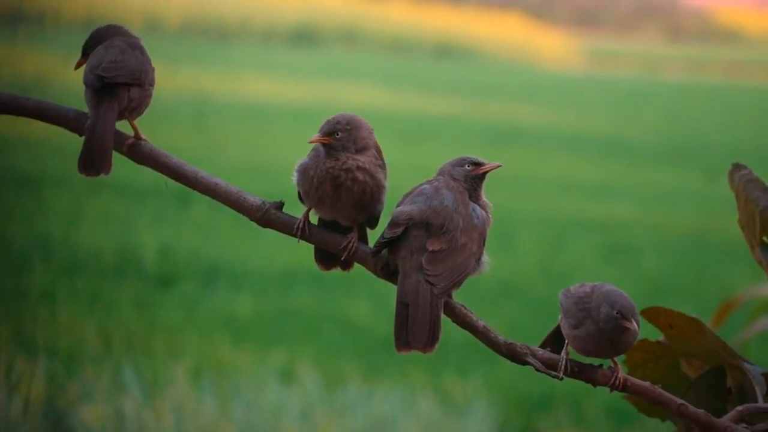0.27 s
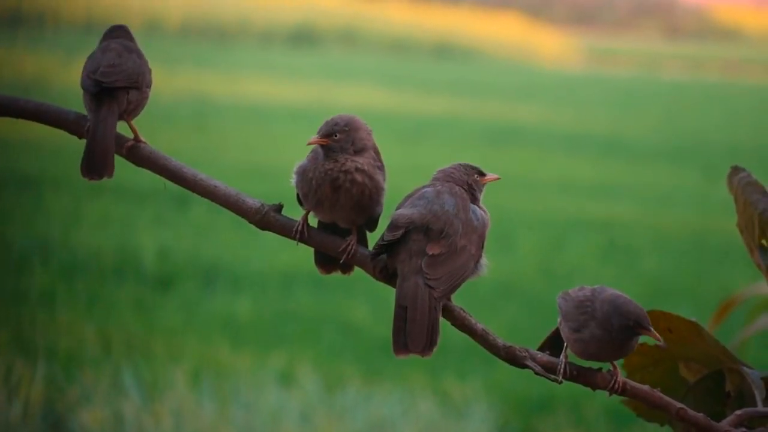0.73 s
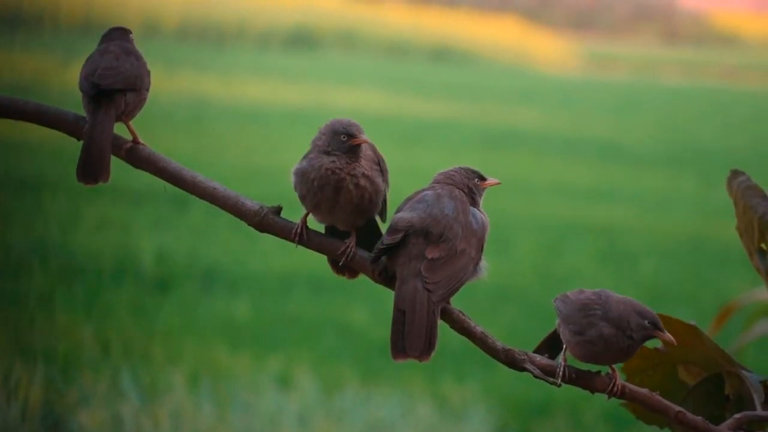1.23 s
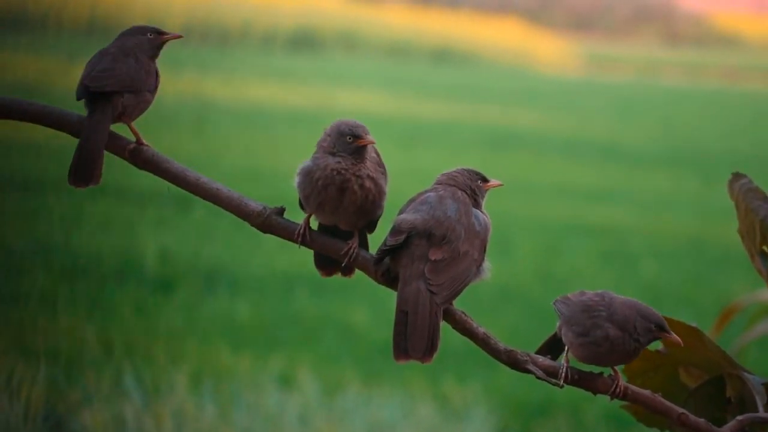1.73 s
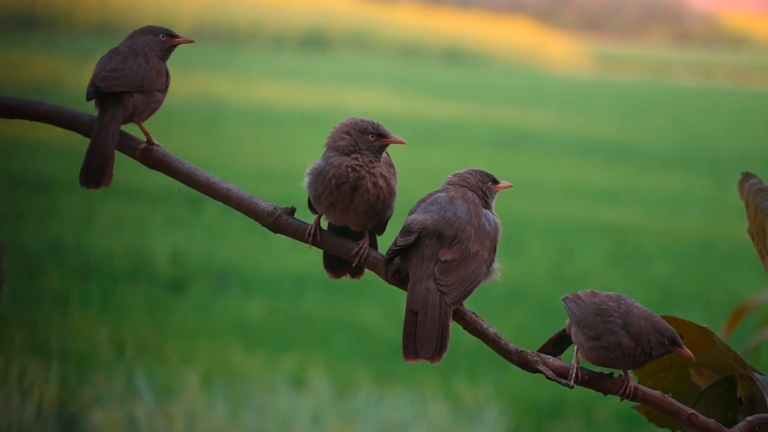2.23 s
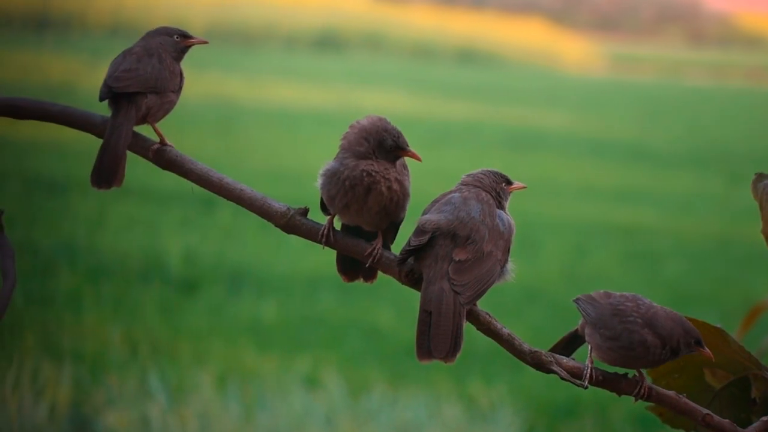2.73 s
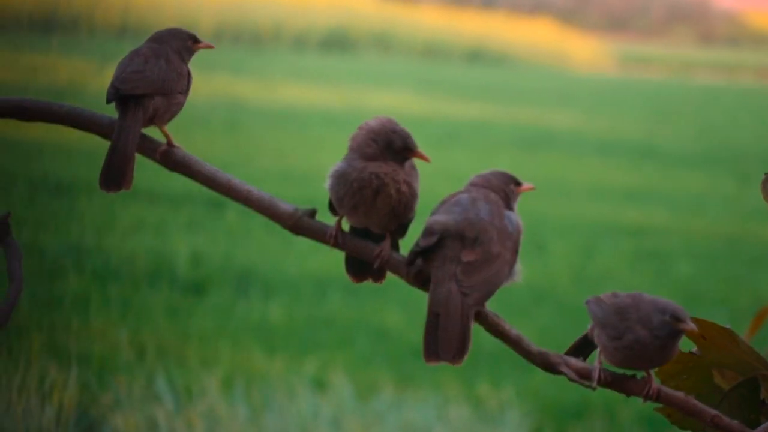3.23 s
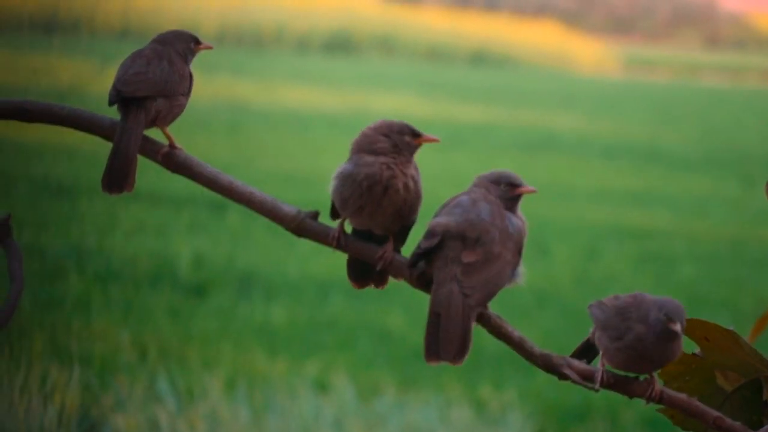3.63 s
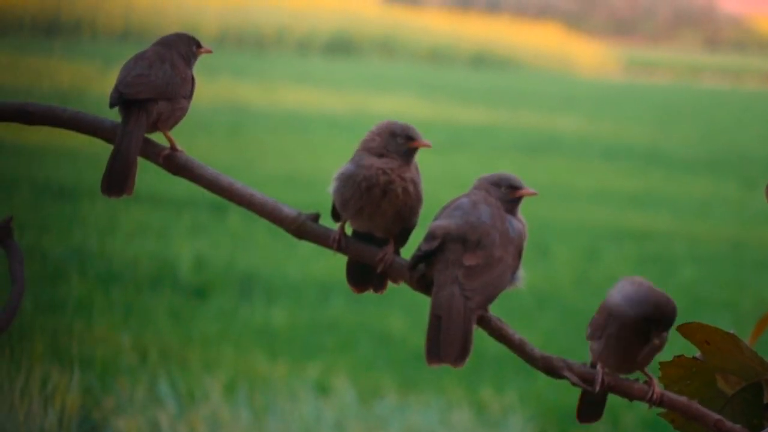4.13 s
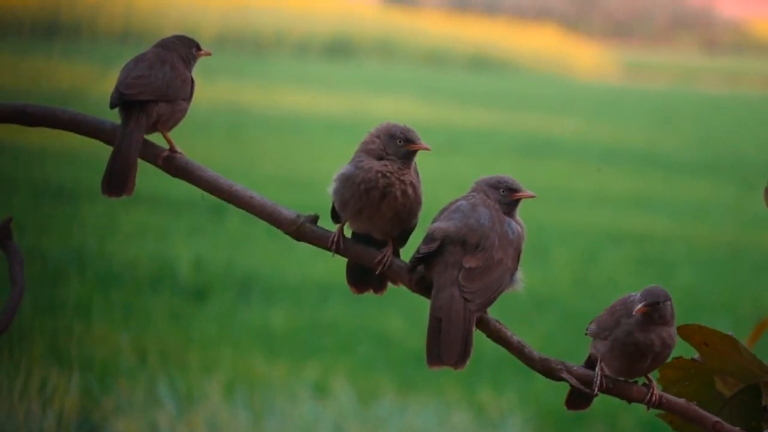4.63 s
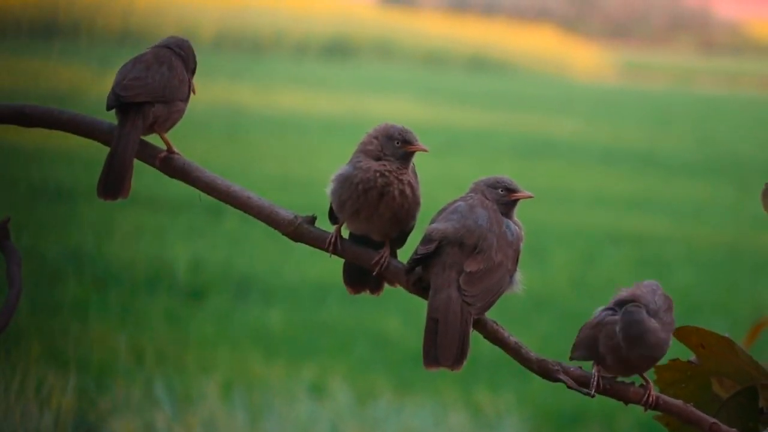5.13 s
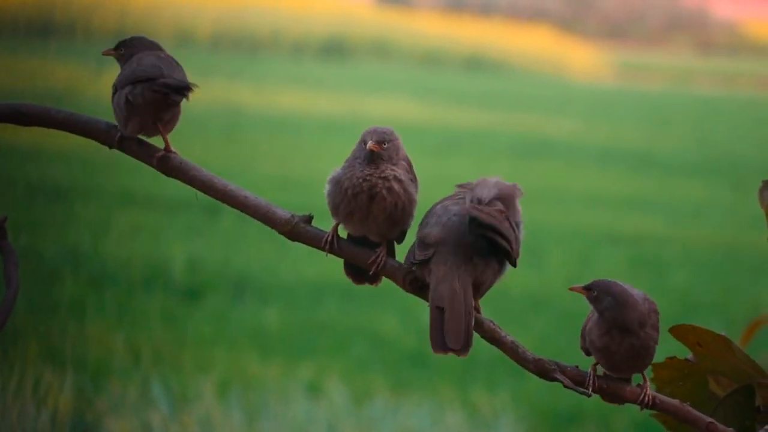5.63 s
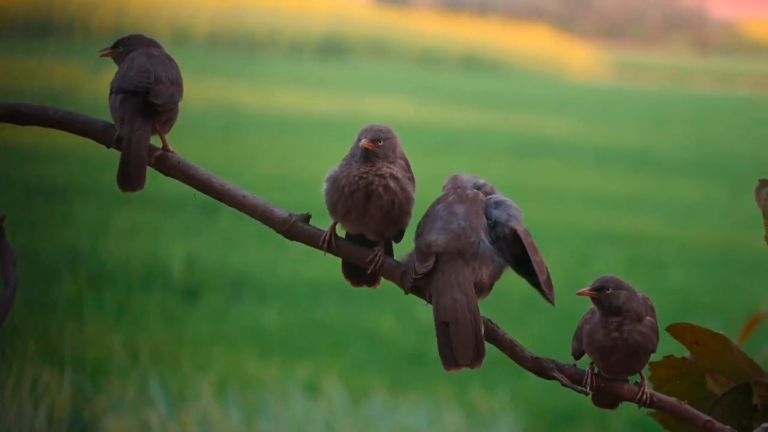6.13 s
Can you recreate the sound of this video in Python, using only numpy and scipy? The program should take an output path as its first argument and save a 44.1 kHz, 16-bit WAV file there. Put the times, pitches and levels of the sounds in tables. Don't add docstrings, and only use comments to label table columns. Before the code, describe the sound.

From 0 to 0.6 seconds a distant bird gives four quick raspy twitters, each flicking up and plunging, with faint insect pips and tiny low hoots. At 0.7 to 1.2 seconds fluttering buzzes and slurs overlap, a dry tick beside them. A lull follows with small twig ticks and faint drops. From about 2.2 to 3.2 seconds a near bird gives five clear rising chirps, roughly a quarter second apart, the first softer, the later ones flatter. After a pause, a small rattle at 3.7 leaps into a bright, strong whistle at 3.9 to 4.05, followed by brief high pips. From 4.5 to 5.7 distant birds answer with dipping, upswung calls, then soft falling two-note calls until 6. Leafy echoes trail throughout, over receding low traffic hum, air in leaves and light microphone hiss, which quieten toward the end.

```python
import sys
import numpy as np
from scipy import signal
from scipy.fft import rfft, irfft
from scipy.io import wavfile
from scipy.ndimage import uniform_filter1d, map_coordinates

SR = 44100
rng = np.random.default_rng(int(sys.argv[2]) if len(sys.argv) > 2 else 0)


def volts_from_db(level):
    exponent = np.asarray(level, float) / 20
    return 10 ** exponent


def digitize_waveform(pressure):
    field = np.atleast_2d(pressure).T
    bounded = np.clip(field, -1, 1)
    quanta = np.round(bounded * 32767).astype(np.int16)
    wavfile.write(sys.argv[1], SR, quanta)


N = 280902


def in_time(rows, t):
    points, *columns = np.transpose(rows)
    return [np.interp(t, points, column) for column in columns]


def drift(rate):
    knots = rng.standard_normal(6000)
    return map_coordinates(knots, [np.arange(N) / SR * rate], order=3)


def coloured(spectrum):
    hz, level_db = np.transpose(spectrum)
    bins = np.maximum(np.fft.rfftfreq(N, 1 / SR), 1)
    colour = volts_from_db(np.interp(np.log(bins), np.log(hz), level_db))
    noise = irfft(rfft(rng.standard_normal(N)) * colour, N)
    return noise / noise.std()


def wide(spectrum, side_db):
    return coloured(spectrum) + volts_from_db(side_db) * coloured(spectrum) * [[1], [-1]]


def add(track, s, sound):
    i = round(s * SR)
    track[i:i + len(sound)] += sound[:N - i]


def whistle(hz, overtone_db):
    phase = 2 * np.pi * np.cumsum(hz) / SR
    return np.sin(phase) + volts_from_db(overtone_db) * np.sin(2 * phase)


def sing(rows, swell, waver, rasp=0., flutter=0., throat=((500, 0), (9000, 0))):
    out, wobble, uneven, torn = np.zeros(N), drift(90), drift(45.9), drift(700)
    for s, length, *bend_hz, level_db in rows:
        u = np.linspace(0, 1, round(length * SR))
        span = (round(s * SR) + np.arange(len(u))) % N
        flutter_hz = 150. * (1 + 0.266 * wobble[span])
        beat = np.cos(2 * np.pi * np.cumsum(flutter_hz) / SR)
        hz = np.polyval(np.polyfit([0, .5, 1], bend_hz, 2), u)
        level = volts_from_db(level_db + in_time(throat, hz)[0] + 2 * flutter * uneven[span])
        level = level * (1 + 0.14 * flutter * beat) * (1 - rasp + rasp * torn[span])
        hz = hz * (1 + waver * wobble[span] + 0.061 * flutter * beat)
        envelope = np.abs(np.sin(np.pi * u)) ** swell
        add(out, s, level * envelope * whistle(hz, overtone_db=-36))
    return out


def bent(rows, start, end):
    return [(s, length, hz * start, hz, hz * end, level_db) for s, length, hz, level_db in rows]


def straight(rows):
    return [(s, length, a, (a + b) / 2, b, level_db) for s, length, a, b, level_db in rows]


def background():
    # f/Hz, level/dB
    traffic_colour = [(12, -48), (20, -12.5), (27, -15), (70, -22), (109, 0.5), (140, -5.5), (166, 5.5),
                      (198, -6.5), (222, -2), (400, -9.5), (520, -26), (880, -120)]
    # f/Hz, level/dB
    air_colour = [(150, -10), (250, -4), (388, -5.5), (486, -2), (1770, -2), (2160, -4), (2370, -3),
                  (6000, -13), (7800, -21), (13200, -120)]
    # f/Hz, level/dB
    hiss_colour = [(2060, -50), (3500, -9.5), (4040, -2.5), (4810, -7.5), (8700, -3), (9440, -4.5),
                   (14200, -12), (15500, -13.5)]
    # t/s, level/dB
    receding = [(0, 4), (.4, 0), (1.5, -0.5), (2.4, -1.5), (5.1, -4), (5.6, -5.5), (6.37, -7.5)]
    receding_db, = in_time(receding, np.arange(N) / SR)
    hum_hz = 170 * (1 + 0.02927 * drift(0.6))
    hum = volts_from_db(-4.0) * whistle(hum_hz, overtone_db=-29) * volts_from_db(drift(7.4))
    traffic_db = -60.5 + receding_db + drift(4.3)
    traffic = volts_from_db(traffic_db) * (wide(traffic_colour, side_db=-28.5) + hum)
    air_db = -48 + 0.47 * receding_db + .5 * drift(9.2)
    air = volts_from_db(air_db) * wide(air_colour, side_db=-31.5)
    hiss = volts_from_db(-58 + 0.62 * drift(12)) * wide(hiss_colour, side_db=-25.5)
    return traffic + air + hiss


def twitter():
    # t/s, plunge length/s, plunge level/dB, uptick level/dB, top level/dB
    syllables = [
        (0.076, 0.034, -34, -43, -39.5),
        (.242, 0.032, -32.5, -33.5, -29.5),
        (.408, 0.052, -31.5, -33, -36),
        (.572, .047, -28.5, -29.5, -32),
    ]
    # f/Hz, level/dB
    throat_colour = [(600, 0), (1900, -9), (2600, -3.5), (3200, -0.5), (3700, 0), (4300, -5), (4800, -3)]
    blip_s, plunge_from_hz, plunge_hz_per_s = .016, 4520, 56000
    upticks = [(s - .03, blip_s, 3274, db) for s, _, _, db, _ in syllables]
    tops = [(s, blip_s, 4765, db) for s, *_, db in syllables]
    plunges = [(s + .013, length, plunge_from_hz, plunge_from_hz - plunge_hz_per_s * length, db)
               for s, length, db, _, _ in syllables]
    rows = bent(upticks, start=.9, end=1.06) + bent(tops, start=.97, end=.975) + straight(plunges)
    return sing(rows, swell=0.13, waver=.013, rasp=0.4, throat=throat_colour)


def insects():
    # t/s, level/dB, f/Hz
    peeps = [(0.0757, -48.5, 8490), (0.2823, -51, 8430), (0.7537, -53, 8450), (4.6638, -46.5, 9850),
             (5.4226, -54, 8920), (5.6506, -53, 8490), (5.854, -51, 8530)]
    rows = [(s - .004, .016, hz, hz, hz, level_db - 2.0) for s, level_db, hz in peeps]
    return sing(rows, swell=1.5, waver=.003)


def hoots():
    # t/s, length/s, f/Hz, level/dB
    calls = [(.187, .022, 2650, -47), (.365, .013, 2070, -46), (.455, 0.038, 660, -48.5),
             (2.335, 0.032, 672, -47), (4.050, 0.046, 746, -54.5), (4.160, 0.04, 1096, -53.5),
             (4.405, 0.03, 1072, -48.5), (2.130, .020, 1120, -53)]
    return volts_from_db(3.5) * sing(bent(calls, start=1.01, end=.98), swell=0.72, waver=0.0046)


def answers():
    # t/s, level/dB, end of dip f/Hz, tag level/dB
    calls = [
        (4.480, -39.5, 3430, -60),
        (4.824, -38.5, 3880, -51),
        (5.178, -40, 4000, -45),
        (5.565, -44.5, 4100, -55),
    ]
    # t/s, length/s, middle f/Hz, level/dB
    hooks = [(.550, .014, 4100, -39), (3.922, 0.014, 4550, -42), (4.160, 0.015, 5890, -45),
             (4.198, 0.013, 4700, -41), (4.222, 0.014, 5800, -43), (4.242, 0.018, 4450, -39.5),
             (4.294, 0.0214, 5870, -44), (4.296, .016, 4865, -36.5), (4.795, 0.034, 5160, -48)]
    # t/s, length/s, middle f/Hz, level/dB
    strays = [(0.19, .022, 3300, -43), (4.162, 0.027, 4530, -38.5), (4.860, 0.063, 3700, -48),
              (5.115, .052, 3730, -50), (5.406, .033, 3360, -46.5), (5.838, 0.033, 3570, -51)]
    drop_s, dip_s, dip_hz = .022, .062, 3325
    drops = [(s, drop_s, 4100, db - 2.5) for s, db, _, _ in calls]
    dips = [(s + drop_s, dip_s, 3600, dip_hz, db) for s, db, _, _ in calls]
    upswings = [(s + drop_s + dip_s, .028, dip_hz, end_hz, db - 2) for s, db, end_hz, _ in calls]
    tags = [(s + .155, 0.0295, 3900, db) for s, *_, db in calls]
    rows = bent(drops + strays, start=1.14, end=.86) + straight(dips + upswings)
    rows += bent(tags, start=.93, end=1.04) + bent(hooks, start=.87, end=1.04)
    return sing(rows, swell=0.14, waver=.007, rasp=.28, flutter=.14)


def ticks():
    # t/s, level/dB, low f/Hz, high f/Hz, time to fall 60 dB/s
    knocks = [(.580, -28, 790, 3000, .02), (1.390, -31, 3780, 6740, .03), (1.528, -37, 3500, 9000, .03),
              (1.612, -31.5, 1500, 6040, .04), (2.302, -24, 2370, 4100, 0.067),
              (2.303, -40.5, 900, 9000, 0.14), (2.4512, -21, 790, 5500, 0.0034),
              (.603, -33, 5500, 7500, .02), (2.278, -53, 2980, 8010, 0.026),
              (4.160, -39, 6170, 11100, 0.023), (3.314, -37, 2980, 7840, .02), (.606, -36, 90, 900, .03),
              (4.625, -28.5, 3000, 5030, .05)]
    out, t = np.zeros(N), np.arange(4000) / SR
    bursts = rng.standard_normal((len(knocks), len(t)))
    for burst, (s, level_db, low_hz, high_hz, t60) in zip(bursts, knocks):
        band = signal.butter(3, [low_hz, high_hz], "band", fs=SR, output="sos")
        attack = np.minimum(t / t60 / 0.029, 1)
        add(out, s, volts_from_db(level_db - 60 * t / t60) * attack * signal.sosfilt(band, burst))
    return out


def buzzes():
    # t/s, length/s, start f/Hz, end f/Hz, level/dB
    slurs = [ (.700, 0.049, 4850, 4720, -38), (.700, 0.058, 3750, 2500, -40),
             (.740, .075, 2150, 2600, -37.5), (.806, 0.059, 3250, 3560, -31), (.850, .095, 3300, 4270, -46),
             (.830, 0.092, 3400, 4550, -40), (.950, .080, 4510, 5060, -36.5),
             (1.005, .125, 3670, 2870, -33), (1.045, .060, 4900, 4930, -43), (1.120, .100, 2920, 3000, -50),
             (.810, 0.0955, 4900, 3800, -43), (.840, 0.075, 2500, 2130, -51),
             (3.940, 0.087, 4600, 4500, -43), (4.045, .029, 5500, 5100, -45.5),
             (4.050, 0.057, 3730, 3540, -43), (2.9, .034, 4860, 4850, -53.5),
             (6.160, .060, 4200, 3300, -56), (5.145, .044, 4680, 4980, -45),
             (4.120, .068, 12000, 13000, -56), ]
    return sing(straight(slurs), swell=.5, waver=.012, rasp=.35, flutter=1.)


def falling_notes():
    # t/s, length/s, start f/Hz, end f/Hz, level/dB
    falls = [ (1.100, .130, 2570, 2610, -40.5), (1.140, 0.068, 2076, 2075, -38.5),
             (1.405, .025, 4170, 3700, -47), (1.770, .025, 4500, 4100, -51), (2.045, .020, 4290, 4040, -48),
             (3.010, 0.047, 4330, 3250, -54), (3.035, .020, 5600, 5080, -53),
             (3.340, 0.069, 4900, 3200, -53), (3.470, .050, 3920, 3030, -50.5),
             (3.480, .015, 4760, 4850, -51), (4.770, 0.051, 2190, 2090, -43.5),
             (4.885, .04, 5700, 5050, -50), (5.515, 0.075, 2870, 2070, -48), ]
    # slide t/s, slide level/dB, pip t/s, pip level/dB
    two_notes = [
        (5.130, -47, 5.190, -46.5),
        (5.230, -51, 5.300, -44),
        (5.795, -49, 5.860, -43),
        (5.915, -48, 5.965, -47),
    ]
    slides = [(s, .06, 2750, db) for s, db, _, _ in two_notes]
    low_pips = [(s, .039, 2170, db) for _, _, s, db in two_notes]
    rows = straight(falls) + bent(slides, start=1.14, end=.86) + bent(low_pips, start=1.055, end=.97)
    return sing(rows, swell=.5, waver=.008, rasp=.25, flutter=.3)


def chirp(s, full, plateau_hz, creep, level_db):
    attack_s, release_s = .036, 0.021
    t = np.arange(0, full + release_s, .002)
    hz = np.minimum(1313 + 16800 * t, plateau_hz + creep * (t - attack_s))
    swell_db = -22 * np.maximum(1 - t / attack_s, 0) ** 1.22
    fade_db = -13 * np.maximum((t - full) / release_s, 0) ** 1.26
    return np.transpose([s + t, hz, level_db + swell_db + fade_db])


def chirps_and_whistle():
    # t/s, full voice until/s after start, plateau f/Hz, creep/Hz per s, level/dB
    chirps = [
        (2.186, 0.04, 2017, 6000, -24.5),
        (2.396, 0.049, 1915, 2220, -17),
        (2.642, 0.05, 1938, 1200, -17.5),
        (2.886, 0.0634, 1903, 60, -17),
        (3.148, 0.068, 1901, 50, -17.5),
    ]
    # t/s, f/Hz, level/dB
    long_whistle = [(3.922, 1900, -29), (3.930, 2344, -18), (3.945, 2260, -16), (3.951, 2270, -20),
                    (3.995, 2238, -14), (4.008, 2260, -14.5), (4.014, 2262, -20), (4.037, 2278, -16.5),
                    (4.047, 2730, -29.5)]
    out = np.zeros(N)
    for note in [chirp(*row) for row in chirps] + [long_whistle]:
        t = np.arange(note[0][0], note[-1][0], 1 / SR)
        hz, level_db = (uniform_filter1d(c, size=180, mode="nearest") for c in in_time(note, t))
        envelope = volts_from_db(level_db) * signal.windows.tukey(len(t), .08)
        add(out, t[0], envelope * whistle(hz, overtone_db=-54.0))
    return out


def grace_notes_and_rattle():
    # t/s, length/s, middle f/Hz, level/dB
    graces = [(2.155, 0.024, 2030, -38), (2.362, 0.032, 2400, -36.5), (2.452, .018, 2080, -22.5),
              (2.612, 0.034, 2540, -33.5), (2.712, 0.018, 1984, -23.5), (2.862, 0.021, 2570, -32.5),
              (3.122, 0.036, 2546, -33.5)]
    flicks = [(3.726, .016, 2900, -40.5), (3.776, .011, 1720, -33.5), (3.775, .0075, 2750, -34),
              (3.785, .008, 3250, -36), (3.857, .008, 1740, -32), (3.855, .011, 3050, -37),
              (3.873, .008, 1750, -33), (3.876, .008, 3450, -39)]
    arches = [
        (3.708, 0.021, 2190, -27),
        (3.732, 0.036, 1755, -32),
    ]
    pipes = [(3.741, 0.028, 3450, -36.5), (3.760, 0.019, 2620, -34), (3.886, .028, 3700, -41),
             (4.043, .024, 3040, -20), (4.052, .019, 2597, -22.5), (4.168, 0.019, 3290, -30),
             (4.226, 0.024, 3315, -34.5), (4.302, 0.026, 3368, -33), (4.475, .021, 3130, -24.5),
             (4.445, .02, 4900, -47), (4.475, .021, 2400, -39), (6.355, 0.017, 3270, -41.5)]
    leaps = [
        (3.876, 0.016, 2500, -31),
        (3.892, .015, 2605, -25),
        (3.906, .019, 2614, -20),
    ]
    rows = bent(graces, start=.93, end=1.04) + bent(flicks, start=0.835, end=1.2)
    rows += bent(arches, start=.8, end=0.97) + bent(pipes, start=1.01, end=0.98)
    rows += bent(leaps, start=0.666, end=.95)
    return sing(rows, swell=0.3, waver=0.002, rasp=.24)


def head_turn(near):
    # t/s, left minus right level/dB
    pan = [(2.4, 0.9), (2.8, 1), (3.2, 1.9), (3.7, 1)]
    pan_db = in_time(pan, np.arange(N) / SR)[0]
    return near * volts_from_db(pan_db * [[.5], [-.5]])


def scatter(x, echo, side_db, dull_hz):
    t = np.arange(round(echo[-1][0] * SR)) / SR
    bright = rng.standard_normal((2, len(t)))
    dull = signal.sosfilt(signal.butter(2, dull_hz, fs=SR, output="sos"), bright)
    tail = dull + (bright - dull) * volts_from_db(-40. * t)
    mid, side = tail * volts_from_db(in_time(echo, t)[0]) / np.sqrt(SR)
    both = np.array([mid + volts_from_db(side_db) * side, mid - volts_from_db(side_db) * side])
    return signal.fftconvolve(x[None], both, axes=1)[:, :N]


def trees(close, distant):
    # delay t/s, level/dB (power per second)
    close_echo = [(0, -14), (.04, -1.5), (.33, -3), (.42, -10), (.6, -17.5), (1.2, -33), (2.0, -52)]
    # delay t/s, level/dB
    distant_echo = [(0, 12.5), (.03, 13.5), (.08, 11.5), (.2, 4), (.4, 0.5), (.8, -17), (1.2, -42)]
    echoes = scatter(close, close_echo, side_db=-10, dull_hz=3500)
    echoes = echoes + scatter(distant, distant_echo, side_db=-14.5, dull_hz=4000)
    return echoes * volts_from_db(0.58 * drift(24.93))


def scene():
    far, buzz, answer = twitter(), buzzes(), answers()
    in_open = falling_notes() + hoots() + insects() + ticks()
    near = chirps_and_whistle() + grace_notes_and_rattle()
    echoes = trees(near + .4 * in_open, far + .6 * buzz + .7 * answer)
    return head_turn(near) + far + buzz + answer + in_open + echoes + background()


def low_pass(x):
    return signal.sosfilt(signal.butter(12, 15690, fs=SR, output="sos"), x)


def record(dry):
    no_bass = signal.butter(2, 55., "high", fs=SR, output="sos")
    no_top = signal.ellip(10, .5, 60, 15520, fs=SR, output="sos")
    mix = signal.sosfilt(np.vstack([no_bass, no_top]), dry)
    return low_pass(mix)


dry = scene()
out = record(dry)
digitize_waveform(out)
```